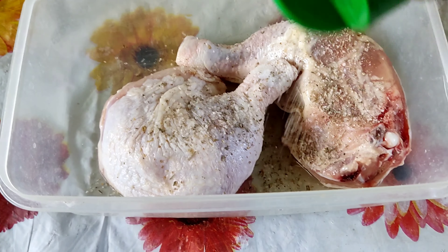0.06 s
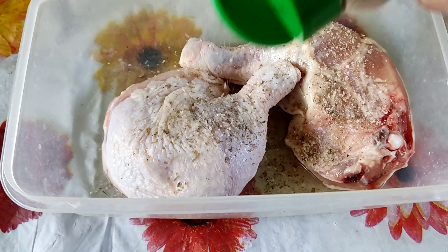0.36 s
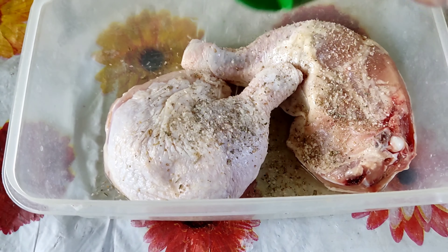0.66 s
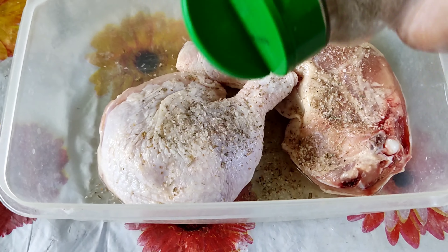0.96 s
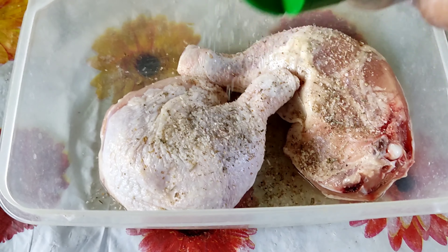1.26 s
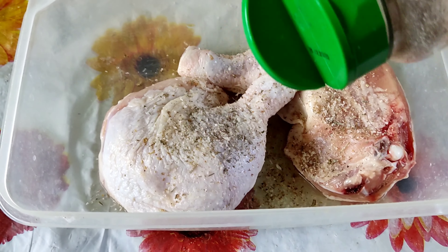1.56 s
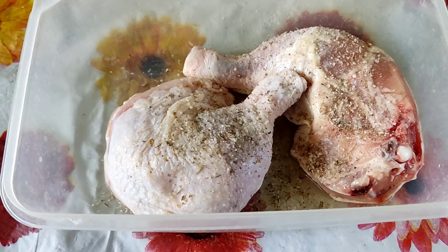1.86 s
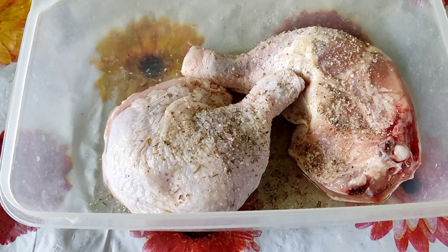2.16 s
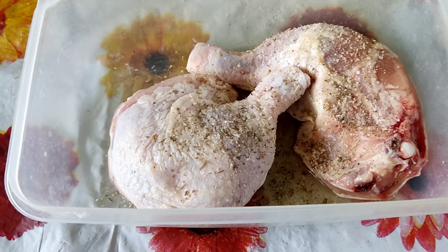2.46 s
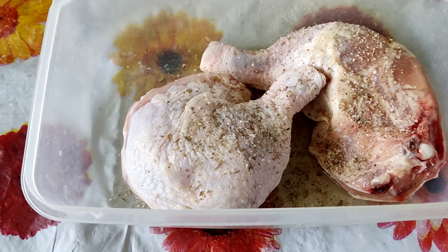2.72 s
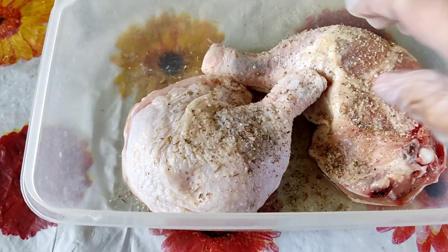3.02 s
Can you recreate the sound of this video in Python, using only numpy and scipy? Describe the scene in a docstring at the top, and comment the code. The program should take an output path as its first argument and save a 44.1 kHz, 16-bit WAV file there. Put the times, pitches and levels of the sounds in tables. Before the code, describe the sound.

Salt rattles from a shaker onto raw chicken, then a gloved hand rubs it in with crinkles, wet squelches and bumps.

```python
"""A crisp rattle of salt, five shakes a second, falls on raw chicken in a plastic tub; the shaker
slides over the tablecloth and lands with a hollow knock. A hand in a thin glove rubs the salt in:
the film crinkles and snaps, wet skin squelches and slaps, and the pieces bump the tub.
A small kitchen, heard close through two microphone ports that ring in the treble."""
import sys
import numpy as np
from scipy import signal
from scipy.io import wavfile

SR = 44100
rng = np.random.default_rng(int(sys.argv[2]) if len(sys.argv) > 2 else 0)


def generate_wav(signal):
    """Clip the signal to [-1, 1] and save it as 16-bit WAV at the path in sys.argv[1]."""
    frames = np.transpose(np.atleast_2d(signal))
    scaled = np.clip(frames, -1, 1) * 32767
    pcm = np.round(scaled).astype(np.int16)
    wavfile.write(sys.argv[1], SR, pcm)


N = 320827
TIME = np.arange(N) / SR

# The tone of salt grains striking. Each row: frequency in Hz, relative level in dB.
SALT_SPECTRUM = [(100, -14), (350, -18), (900, -15), (1700, -0.5), (3300, -7), (4300, -2), (6500, -3),
                 (9000, -2), (14000, -3)]
# Soft, heavy bumps, first the shaker and then the meat. Each row: start in seconds, relative level in dB,
# pitch in Hz, t60 in seconds, contact time in seconds, relative table rumble in dB.
BUMPS = [(0.8858, -31, 770, 0.009, 0.00031, -60), (2.529, -13, 250, 0.032, 0.0005, -31),
         (3.172, -24.5, 380, 0.031, 0.00055, -39), (3.205, -44, 270, .05, .001, -44),
         (3.239, -36, 367, 0.047, .001, -43.5), (3.312, -36, 201, 0.029, .001, -57),
         (3.344, -27.5, 404, 0.019, 0.0011, -51), (3.575, -21.5, 260, 0.039, 0.0044, -44),
         (3.669, -18.5, 298, 0.027, 0.0019, -35.5), (3.842, -14.5, 675, 0.017, .0006, -40),
         (3.890, -15.5, 327, 0.027, 0.005, -36.5), (3.956, -21.5, 392, 0.076, 0.001, -42),
         (4.171, -8.5, 290, 0.027, 0.0043, -38.5), (4.488, -23.5, 390, 0.05, 0.0039, -57),
         (4.521, -37, 79, 0.11, 0.0035, -56), (4.748, -42, 397, .03, 0.00092, -59),
         (5.185, -24.5, 138, 0.038, 0.0044, -42.5), (5.242, -46, 399, .03, .001, -46),
         (5.612, -39, 390, 0.05, 0.00087, -50), (5.79, -38, 198, 0.033, .001, -46),
         (5.8557, -25.5, 232, 0.0088, 0.00031, -45), (5.897, -32, 387, 0.05, 0.00033, -42),
         (6.278, -29.5, 420, 0.012, 0.00042, -47), (6.345, -22, 202, 0.024, 0.0036, -36.5),
         (6.477, -39, 340, 0.061, 0.0011, -46), (6.578, -37.5, 443, 0.038, 0.00086, -55),
         (7.156, -28, 290, 0.023, 0.00089, -39)]
# The modes of the plastic tub. Each row: frequency in Hz, relative level in dB, t60 in seconds.
TUB_MODES = [(303, -12.5, 0.33), (396, -13.5, 0.097), (646, -0.5, 0.022), (720, 1, 0.028),
             (979, 4.5, 0.025), (1023, 4.5, 0.019), (1410, 3, 0.013), (1553, 4.5, 0.025), (1650, -23, 0.44),
             (2050, 5, 0.018), (2850, -7, 0.0075)]


def gain_of(db):
    """Decibels to gain."""
    return 10 ** (np.asarray(db) / 20)


def unit_rms(x):
    """Scales to rms 1."""
    return x / np.sqrt(np.mean(x ** 2) + 1e-20)


def curve_at(points, hz):
    """Reads a curve on a log-frequency axis."""
    f, value = np.transpose(points)
    return np.interp(np.log(hz + 1), np.log(f + 1), value)


def add(mix, s, sound):
    """Mixes a sound into both channels at s seconds."""
    part = mix[:, max(round(s * SR), 0):][:, :sound.shape[-1]]
    part += sound[..., :part.shape[1]]


def colour(x, spectrum, size=8192):
    """Minimum-phase EQ with the given spectrum."""
    log_gain = np.log(gain_of(curve_at(spectrum, abs(np.fft.fftfreq(size, 1 / SR)))))
    taps = np.fft.ifft(np.exp(np.conj(signal.hilbert(log_gain)))).real[:size // 2]
    return signal.oaconvolve(np.atleast_2d(x), taps[None], axes=1)[:, :x.shape[-1]]


def shade(x, left_db):
    """The microphone housing shadows the treble of a sound that lies to one side."""
    dull = signal.lfilter(*signal.butter(1, 7000, fs=SR), x)
    return dull + (x - dull) * gain_of(np.array([[1], [-1]]) * left_db)


def drift(per_s):
    """A wander between random points of rms 1."""
    knots = np.arange(0, N / SR + 1, 1 / per_s)
    return np.interp(TIME, knots, unit_rms(rng.standard_normal(len(knots))))


def surge(s, db, rise, fall):
    """Power of a burst that grows to its peak at s seconds and dies away."""
    near, power = slice(max(round((s - .5) * SR), 0), round((s + .5) * SR)), np.zeros(N)
    t = TIME[near] - s
    power[near] = (gain_of(db) * np.exp(np.minimum(t / rise, -t / fall))) ** 2
    return power


def grains(per_s, spread_db, clump_db, clumps_per_s, lag_samples=7):
    """Clumped clicks of uneven strength, each reaching the ports from its own direction."""
    chance, strength, side = rng.random(N), rng.standard_normal(N), rng.standard_normal(N)
    clicks = (chance < per_s / SR) * rng.choice([-1., 1.], N)
    clicks *= gain_of(spread_db * np.minimum(strength, 2.6))
    clicks *= gain_of(clump_db * drift(clumps_per_s))
    arrival = np.clip(np.arange(N) + rng.integers(-lag_samples, lag_samples + 1, N), 0, N - 1)
    left, right = clicks * gain_of(2 * side), np.bincount(arrival, clicks * gain_of(-2 * side), N)
    return unit_rms(np.array([left, right]))


def ring(hz, t60, size=16384):
    """One dying mode."""
    t = np.arange(size) / SR
    return np.sin(2 * np.pi * hz * t) * np.exp(-np.log(1000) * t / t60)


def tub_ring(size=4096, tune=1):
    """The tub's answer to one tap, its modes alternating in polarity."""
    modes = (gain_of(db) * ring(hz * tune, t60) * (-1) ** k for k, (hz, db, t60) in enumerate(TUB_MODES))
    return sum(modes)[:size]


def room_tone():
    """A bed of low rumble and faint hiss, partly shared by the ports."""
    # The quiet kitchen. Each row: frequency in Hz, relative level in dB.
    spectrum = [(10, 6.5), (25, 5), (50, -4), (100, -10.5), (170, -15.5), (300, -19.5), (650, -22.5),
                (1200, -20.5), (3000, -20), (6000, -26.5), (14000, -68)]
    noise = rng.standard_normal((2, N)) + 0.39 * rng.standard_normal(N)
    return gain_of(-50.0 + 1.56 * drift(per_s=3.3)) * unit_rms(colour(noise, spectrum))


def kitchen(x, count=6, shifts_per_s=22):
    """Short diffuse tails, crossfaded in turn: the reflections keep shifting, as around a moving hand."""
    # The room's decay. Each row: frequency in Hz, t60 in seconds.
    decay_times = [(150, 0.069), (500, 0.044), (2000, 0.12), (8000, 0.045), (14000, 0.067)]
    noise = rng.standard_normal((count, 2, SR // 4)) * (np.arange(SR // 4) > .004 * SR)  # 4 ms pre-delay
    hz, t, bands = signal.stft(noise, SR, nperseg=256)
    decay = np.exp(-np.log(1000) * t / curve_at(decay_times, hz)[:, None])
    tails = signal.istft(bands * decay, SR, nperseg=256)[1]
    out = np.zeros((2, N))
    for k, tail in enumerate(tails):
        away = abs((TIME * shifts_per_s - k) % count - count / 2)
        share = np.cos(np.pi / 2 * np.minimum(away, 1))
        out += signal.oaconvolve(x * share, tail / np.linalg.norm(tail[0]), axes=1)[:, :N]
    return out


def table_rumble(crinkle, rise_s=0.0057, fall_s=0.022):
    """The table gives and settles after each bump, and rumbles a little under each stroke."""
    # Table and tub under the hand's weight. Each row: frequency in Hz, relative level in dB.
    spectrum = [(25, -14), (60, -2), (110, -2), (170, -2.5), (260, -3.5), (450, -12), (1200, -57)]
    shifts = grains(per_s=1200, spread_db=1.5, clump_db=3.5, clumps_per_s=23, lag_samples=20)
    load = (gain_of(-31.5) * crinkle) ** 2  # the hand leaning in
    for s, *_, db in BUMPS:
        load += surge(s + rise_s, db, rise_s, fall_s)
    return gain_of(-1) * np.sqrt(load) * unit_rms(colour(shifts, spectrum))


def scuffs():
    """Friction swells and fades, stirring one hollow resonance of what is rubbed."""
    # Things shifting on the table and in the tub. Each row: peak time in seconds, level in dB,
    # half length in seconds, pitch in Hz, width of the resonance in Hz.
    scrapes = [(1.403, -53.5, 0.024, 445, 500), (1.636, -47.5, 0.046, 627, 380),
               (1.812, -61, 0.092, 523, 600), (2.12, -52.5, 0.098, 383, 454),
               (2.174, -35, 0.077, 2520, 1270), (2.828, -54, 0.031, 616, 605),
               (3.302, -46.5, 0.14, 1570, 242), (3.493, -50, 0.13, 1070, 506),
               (5.42, -53.5, 0.21, 970, 700), (4.824, -56, 0.029, 616, 450),
               (6.004, -44.5, 0.067, 2250, 600), (6.686, -44, 0.12, 2077, 1400)]
    slips = grains(per_s=3000, spread_db=1.5, clump_db=2.0, clumps_per_s=130, lag_samples=12)
    out = np.zeros((2, N))
    for s, db, half, hz, width in scrapes:
        band = signal.iirpeak(hz, hz / width, fs=SR)
        hollow = signal.lfilter(*band, signal.lfilter(*band, slips))
        out += gain_of(db) * np.exp(-((TIME - s) / half) ** 2) * unit_rms(hollow)
    return out


def shaker_slide():
    """The shaker catches on the weave of the tablecloth, off to the left."""
    # The swell of the slide. Each row: time in seconds, relative level in dB.
    swell = [(1.95, -48.5), (2.02, -32), (2.08, -23.5), (2.17, -24.5), (2.23, -30), (2.28, -34.5),
             (2.32, -52)]
    # The rasp of the cloth. Each row: frequency in Hz, relative level in dB.
    cloth = [(150, -19), (500, -17), (950, -12.5), (1600, -1), (2800, 5), (3500, -3), (4200, 7.5),
             (6500, 4), (9000, -1), (14000, 1.5)]
    weave = grains(per_s=7800, spread_db=2.5, clump_db=1.5, clumps_per_s=120)
    level = gain_of(np.interp(TIME, *np.transpose(swell), left=-100, right=-100) - 12.0)
    return shade(level * unit_rms(colour(weave, cloth)), left_db=5.5)


def shaker_knock(start_s=2.5295, level_db=-28.5):
    """The shaker lands on the table with a hollow knock."""
    # The shaker's modes. Each row: frequency in Hz, relative level in dB, t60 in seconds.
    modes = [(292, -1.5, 0.13), (409, -19, 0.097), (511, -7, 0.04), (583, -10, 0.05), (726, -16, 0.024),
             (910, -1.5, 0.033), (1160, -27, 0.026)]
    out = np.zeros((2, N))
    add(out, start_s, -sum(gain_of(level_db + db) * ring(hz, t60) for hz, db, t60 in modes))
    return out


def bumps():
    """A soft weight sinks in and lands: one low damped note, a dull push and the long ring of the tub."""
    out, t = np.zeros((2, N)), np.arange(16384) / SR
    tub_hz, _, tub_t60 = TUB_MODES[0]
    for s, db, hz, t60, contact, _ in BUMPS:
        note = ring(hz, t60) + gain_of(-28.5) * ring(tub_hz, tub_t60)
        push = gain_of(-10.5) * ring(hz * 0.5, t60 * 0.64) + gain_of(-41.0) * ring(105, 0.14)
        add(out, s, -gain_of(db - 2.5) * (1 - np.exp(-t / contact)) * (note + push))
    return out


def bubble(hz, size=1024, scatter_octaves=0.364, life_cycles=17.6, glide=0.41):
    """A tiny pocket of juice bursts: a few cycles that swell and rise in pitch, a little to one side."""
    detune, side = np.clip(rng.standard_normal(2), -2, 2)
    cycles = np.arange(size) / SR * hz * 2 ** (scatter_octaves * detune)
    age = cycles / life_cycles
    envelope = np.exp(-np.log(1000) * age) * (1 - np.exp(-cycles ** 2))
    pop = np.sin(2 * np.pi * cycles * (1 + glide * age)) * envelope
    return pop * gain_of(np.array([[2], [-2]]) * side)


def juice(squelch, size=4096, bubbles_per_s=900, strays_per_s=150, stray_db=11):
    """Bubbles burst in clusters where the fingers squeeze; strays crackle under every wet stroke."""
    # Juice squeezed between glove and skin. Each row: start in seconds, level in dB,
    # length in seconds, centre pitch in Hz.
    squeezes = [(3.684, -46, 0.012, 2120), (3.776, -44.5, 0.019, 2480), (5.894, -45.5, 0.01, 2153),
                (5.929, -41.5, 0.0092, 1600), (6.061, -37, 0.01, 2097), (6.075, -33, 0.023, 1890),
                (6.104, -37, 0.026, 1590), (6.267, -48, 0.004, 2302), (6.395, -51.5, 0.049, 1103),
                (6.472, -43.5, 0.011, 2186), (6.562, -61, .022, 2370), (6.62, -42, 0.032, 2170),
                (6.676, -44, .012, 2090), (6.691, -41.5, .02, 1546), (6.719, -37, 0.0098, 1760)]
    out = np.zeros((2, N))
    for s, db, length, hz in squeezes:
        cluster, count = np.zeros((2, size)), max(round(bubbles_per_s * length), 1)
        for when in (np.arange(count) + rng.random(count)) / bubbles_per_s:
            add(cluster, when, rng.standard_normal() * bubble(hz))
        add(out, s, gain_of(db) * np.sqrt(length * SR / size) * unit_rms(cluster))
    for at in np.flatnonzero((rng.random(N) < strays_per_s / SR) & (squelch > 0)):
        add(out, at / SR, gain_of(stray_db + 1.3 * rng.uniform(-1.3, 1)) * squelch[at] * bubble(hz=1910))
    return out


def wet_skin(squelch, tub_db=-8.5):
    """Tiny films of juice part under the rubbing hand and faintly ring the tub."""
    # The tone of the squelch. Each row: frequency in Hz, relative level in dB.
    spectrum = [(80, -4), (300, -9.5), (600, -9), (1000, 0.5), (1550, 0.5), (1900, -5.5), (2300, 5),
                (3300, -1.5), (6000, -11.5), (14000, -29)]
    partings = grains(per_s=1100, spread_db=1.0, clump_db=5.0, clumps_per_s=98, lag_samples=12)
    smacks = squelch * unit_rms(colour(partings, spectrum))
    tub = tub_ring()
    hollow = signal.oaconvolve(smacks.mean(0), tub / np.linalg.norm(tub))[:N]
    return gain_of(-0.5) * smacks + gain_of(tub_db) * hollow


def slaps(size=4096, rise_s=0.0017, detune=0.06):
    """Wet contact: a quick scatter of smacks, dulled by the flesh, heard directly and through the tub."""
    # Skin slapping and peeling off the tub. Each row: start in seconds, relative level in dB, decay in
    # seconds, air pocket pitch in Hz, low-pass cutoff in Hz, trim of the tub's ring in dB.
    hits = [(2.53, -34, 0.003, 890, 1800, 1), (3.169, -10.5, 0.0019, 920, 2000, -4.5),
            (3.179, -28, 0.0038, 970, 2000, -6), (3.194, -22.5, 0.0019, 854, 2200, -8),
            (3.338, -33, 0.0033, 930, 2220, 1.5), (3.681, -24, 0.021, 1115, 2980, -0.5),
            (3.79, -25, 0.0021, 1376, 3490, 0.5), (3.813, -28, 0.0017, 870, 2500, 3),
            (3.84, -3, 0.0019, 1140, 2140, -12), (3.951, -24, 0.004, 1070, 2000, -3),
            (4.169, -22, 0.0047, 680, 1800, -11), (4.48, -21, 0.0067, 1200, 3010, -5),
            (4.489, -15.5, 0.0013, 1150, 2470, -7), (4.626, -24.5, 0.0069, 1190, 3500, -4),
            (5.38, -13.5, 0.0016, 1210, 5000, -3), (5.5003, -11.5, 0.0025, 1432, 2200, 0.5),
            (5.611, -35, 0.0036, 890, 3000, 5), (5.898, -19, 0.0031, 1620, 4000, -5),
            (6.278, -24, 0.0024, 850, 1800, -3.5), (6.346, -31.5, 0.0036, 522, 1200, -6),
            (6.475, -37, 0.0044, 1107, 3500, -6), (7.1538, -20.5, 0.0018, 774, 2194, -1.5)]
    # The tone of the direct smack. Each row: frequency in Hz, relative level in dB.
    spectrum = [(100, -20.5), (350, 10), (600, 2.5), (1200, 6), (1800, 1.5), (2700, 0.5), (4000, 5),
                (6000, -8), (9000, -23), (14000, -18)]
    out, t = np.zeros((2, N)), np.arange(size) / SR
    for s, db, decay, hz, top_hz, ring_db in hits:
        noise = rng.standard_normal(size) + 0.43 * rng.standard_normal((2, size))
        envelope = np.exp(-t / decay) * (1 - np.exp(-t / rise_s))  # flesh closes on plastic gradually
        contact = signal.lfilter(*signal.butter(2, top_hz, fs=SR), noise * envelope)
        pocket = signal.lfilter(*signal.iirpeak(hz, 1.1, fs=SR), contact)
        # Grip and meat load the wall anew at each slap, shifting its pitch.
        tub = tub_ring(size=16384, tune=1 + detune * rng.uniform(-1, 1))
        hollow = signal.fftconvolve(pocket, tub[None], axes=1)
        spatter = colour(pocket + 0.29 * contact, spectrum)
        add(out, s, gain_of(db + 15.5 + ring_db) * hollow / np.linalg.norm(hollow))
        add(out, s, gain_of(db + 9.5) * spatter / np.linalg.norm(spatter))
    return out


def rubbing(hand_from_s=1.5, resting_db=-51.5, stick_db=2, sticks_per_s=51):
    """Envelopes of crinkle and squelch: each stroke swells and fades as the film catches and lets go."""
    # Strokes of the gloved hand. Each row: peak time in seconds, relative crinkle in dB,
    # relative squelch in dB, half length in seconds.
    strokes = [(2.362, -37.5, -94, 0.048), (2.519, -38, -52, 0.038), (2.644, -41.5, -81, 0.041),
               (3.2, -32, -53, 0.059), (3.328, -31, -75, 0.07), (3.513, -26.5, -46.5, 0.074),
               (3.671, -29, -46, 0.05), (3.765, -28, -47, 0.032), (3.869, -32, -49.5, 0.067),
               (4.007, -38.5, -55.5, 0.062), (4.161, -31, -46.5, 0.055), (4.326, -34.5, -50, 0.092),
               (4.508, -34, -48, 0.024), (4.645, -36.5, -48, 0.059), (4.793, -40, -54, 0.039),
               (4.885, -35.5, -58, 0.016), (4.95, -27, -57, 0.05), (5.034, -47, -51, 0.029),
               (5.091, -35, -69, 0.034), (5.241, -35, -48, 0.085), (5.421, -33.5, -44.5, 0.14),
               (5.605, -30.5, -47, 0.065), (5.772, -33, -52, 0.066), (5.977, -34.5, -43.5, .13),
               (6.158, -33, -47, 0.094), (6.33, -36.5, -50, 0.081), (6.408, -31, -50, 0.029),
               (6.485, -39.5, -50, 0.097), (6.608, -30.5, -45, 0.055), (6.738, -36.5, -49, 0.062),
               (6.841, -38, -56, 0.066), (6.955, -34.5, -56, 0.023), (7.033, -43.5, -59.5, 0.053),
               (7.226, -36.5, -51, 0.071)]
    power = np.zeros((2, N))
    for s, crinkle_db, squelch_db, half in strokes:
        t = np.arange(-3 * half, 3 * half, 1 / SR)
        bell = np.exp(-(t / half) ** 2)
        add(power, s + t[0], (gain_of([[crinkle_db], [squelch_db]]) * bell) ** 2)
    power[0] += (TIME > hand_from_s) * gain_of(resting_db) ** 2  # the glove barely stirs between strokes
    return np.sqrt(power) * gain_of(stick_db * drift(sticks_per_s))


def glove_crinkle(crinkle, crease_db=-7):
    """Thin film crinkles in clumps as the fingers slide; now and then a crease flips with a crisp tick."""
    # The tone of the film. Each row: frequency in Hz, relative level in dB.
    spectrum = [(200, -28), (1000, -4), (3000, -1), (5000, 2), (7000, 1), (9000, 1.5), (11000, 1.5),
                (14000, 0.5)]
    # Where the hand is. Each row: time in seconds, treble lean to the left in dB.
    hand_side = [(2.3, 7), (2.6, 6.5), (3.05, 4.5), (3.2, 1), (4.3, 0.5), (4.8, 0.5), (5.2, 2), (5.7, 0),
                 (6.2, 2), (7.27, 0)]
    folds = grains(per_s=5500, spread_db=-1.0, clump_db=2.0, clumps_per_s=160)
    creases = grains(per_s=45, spread_db=1.4, clump_db=2.0, clumps_per_s=31)
    film = unit_rms(colour(folds + gain_of(crease_db) * creases, spectrum))
    return shade(gain_of(-12.5) * crinkle * film, left_db=np.interp(TIME, *np.transpose(hand_side)))


def glove_snaps(crack_size=2048, pop_size=1024, pop_rise_s=0.00056):
    """Film lets go of the skin with a crack, and the air pocket beneath it opens with a pop."""
    # The film snapping free. Each row: start in seconds, relative crack level in dB, pop level in dB,
    # pop pitch in Hz, time to the crack's peak in seconds.
    snaps = [(2.7366, -25, -45, 3860, 0.00069), (2.777, -20, -52, 3600, 0.001),
             (3.8216, -8, -60, 2000, 0.00055), (4.11, -20, -53, 2037, 0.0012),
             (4.142, -13, -52, 2220, 0.0033), (4.2677, -2.5, -7.5, 2250, 0.0012),
             (4.928, -12, -60, 2480, 0.001), (5.379, 3.5, -9.5, 1570, 0.0019),
             (5.8548, -7.5, -35, 1860, 0.00087)]
    # The tone of the crack. Each row: frequency in Hz, relative level in dB.
    spectrum = [(300, -13.5), (1500, 4.5), (3500, -3.5), (5300, -0.5), (7000, -3), (9000, -4), (11500, -4),
                (13500, -7)]
    out = np.zeros((2, N))
    opening = 1 - np.exp(-np.arange(pop_size) / SR / pop_rise_s)
    for s, crack_db, pop_db, hz, peak_s in snaps:
        age = np.arange(crack_size) / SR / peak_s
        crack = rng.choice([-1., 1.], (2, crack_size)) * (age * np.exp(1 - age)) ** 4
        add(out, s, gain_of(crack_db - 16.0) * colour(crack, spectrum))
        pop = ring(hz, t60=0.013) - gain_of(-2.0) * ring(hz * 0.74, t60=0.011)
        pop += gain_of(-9.0) * ring(hz * 0.44, t60=0.0073)
        add(out, s, gain_of(pop_db) * opening * pop[:pop_size])
    return out


def salt_ticks(size=1024, scatter_s=0.0014):
    """Coarse grains strike hard: a sharp tick, then a tiny scatter."""
    # Single grains landing. Each row: start in seconds, relative level in dB.
    strikes = [(0.0294, -10.5), (0.256, -5.5), (0.258, -15), (0.302, -16), (0.3193, -7), (0.336, -7),
               (0.4931, -7), (0.501, -12), (0.682, -12), (0.8551, -14), (0.869, -15), (0.8856, -3.5),
               (0.8864, -6), (0.8872, -7), (1.067, -12.5), (1.268, -12), (1.649, -6), (1.7597, -12),
               (1.863, -19), (1.867, -14), (1.907, -19.5), (1.917, -31), (2.073, -7.5), (2.086, -13),
               (2.326, -24), (2.369, -28), (2.457, -23.5), (2.621, -38), (2.6275, -33), (2.75, -36),
               (2.768, -41), (2.7767, -31), (4.532, -30), (6.501, -19), (6.636, -11), (6.972, -20)]
    out, t = np.zeros((2, N)), np.arange(size) / SR
    for s, db in strikes:
        tick = .1 * rng.choice([-1., 1.], (2, size)) * np.exp(-t / scatter_s)
        tick[:, 0] = 1
        add(out, s, gain_of(db) * tick)
    return colour(out, SALT_SPECTRUM)


def spray(flow, spectrum):
    """A stream of fine salt with coarser grains rattling through it."""
    fine = grains(per_s=6000, spread_db=0.5, clump_db=2.5, clumps_per_s=170)
    coarse = grains(per_s=380, spread_db=1.2, clump_db=0.5, clumps_per_s=68)
    return np.sqrt(flow) * unit_rms(colour(fine + gain_of(-3.5) * coarse, spectrum))


def salt_shaker():
    """Salt sprays out on each down stroke and slips back inside between them; the last grains settle."""
    # Down strokes, softer-edged as the wrist slows. Each row: peak time in seconds,
    # relative level in dB, rise in seconds, fall in seconds.
    shakes = [(0.129, -20, 0.021, 0.034), (0.324, -21.5, 0.019, 0.038), (0.498, -22, 0.012, 0.046),
              (0.693, -19.5, 0.014, 0.031), (0.894, -19.5, 0.018, 0.023), (1.083, -24, 0.02, 0.048),
              (1.298, -24, 0.04, 0.037), (1.499, -22, 0.04, 0.036), (1.696, -20, 0.025, 0.017)]
    # Salt slipping back. Each row: peak time in seconds, relative level in dB.
    back_swings = [(0.035, -28), (0.228, -26.5), (0.424, -30), (0.61, -30), (0.801, -28), (0.991, -28.5),
                   (1.205, -29), (1.406, -26.5), (1.601, -29.5)]
    # Its tone inside the shaker. Each row: frequency in Hz, relative level in dB.
    inside_spectrum = [(100, -24), (400, -6), (900, -5.5), (1700, 4), (3300, 0), (4300, 4.5), (6500, 1.5),
                       (9000, -2), (14000, 0)]
    # The last grains trickling out. Each row: time in seconds, relative level in dB.
    trickle = [(1.69, -50), (1.76, -38.5), (1.83, -45.5), (1.91, -41.5), (1.95, -63)]
    flow = gain_of(np.interp(TIME, *np.transpose(trickle), left=-100, right=-100)) ** 2
    flow += sum(surge(*shake) for shake in shakes)
    back = sum(surge(s, db, rise=0.039, fall=0.03) for s, db in back_swings)
    return shade(gain_of(-9.0) * (spray(flow, SALT_SPECTRUM) + spray(back, inside_spectrum)), left_db=1.1)


def scene():
    """Four groups of sources, each with its own send to the kitchen reverb, over the room tone."""
    crinkle, squelch = rubbing()
    rustle = salt_shaker() + shaker_slide() + glove_crinkle(crinkle)
    sharp = salt_ticks() + glove_snaps()
    wet = wet_skin(squelch) + juice(squelch) + scuffs() + slaps()
    low = bumps() + shaker_knock() + table_rumble(crinkle)
    send = gain_of(0.5) * rustle + gain_of(-22.5) * sharp + gain_of(-7.5) * wet + gain_of(-7.0) * low
    return rustle + sharp + wet + low + kitchen(send) + room_tone()


def record(dry, top_hz=15595):
    """Each port rings at its own pitch; the sharpest snaps overload; a steep low-pass trims the top."""
    # The colour of each microphone port. Each row: frequency in Hz, gain in dB.
    left_port = [(500, 3), (950, -1.5), (1600, -8), (5500, 0), (6800, 6.5), (7500, 5.5), (9300, 8),
                 (10200, 16), (11100, 14.5), (12400, 10.5), (14250, 2), (14500, -39), (16000, -51)]
    right_port = [(500, 3.5), (1200, -1), (1800, -2.5), (3500, -2.5), (5600, 0.5), (7000, 10), (8000, 18.5),
                  (9100, 29), (10000, 20), (11200, 17.5), (12400, 5.5), (14200, 6), (14550, -37),
                  (16000, -34)]
    ported = np.vstack([colour(dry[0], left_port), colour(dry[1], right_port)])
    lowpass = signal.firwin(511, top_hz, window=("kaiser", 9), fs=SR)
    return signal.oaconvolve(np.clip(ported, -1, 1), lowpass[None], "same")


dry = scene()
out = record(dry)
generate_wav(out)
```